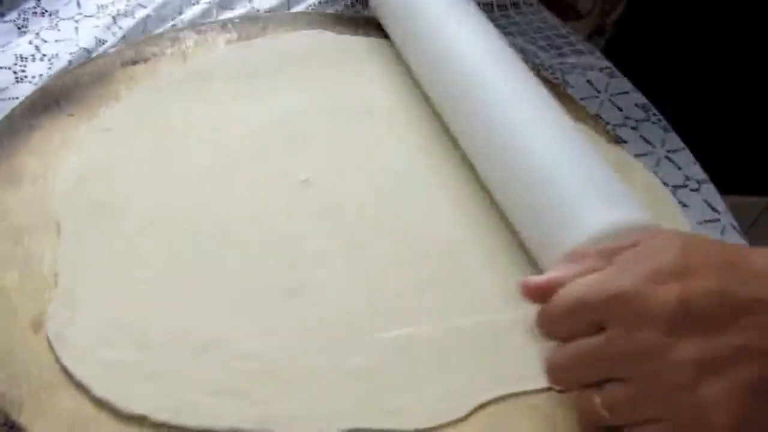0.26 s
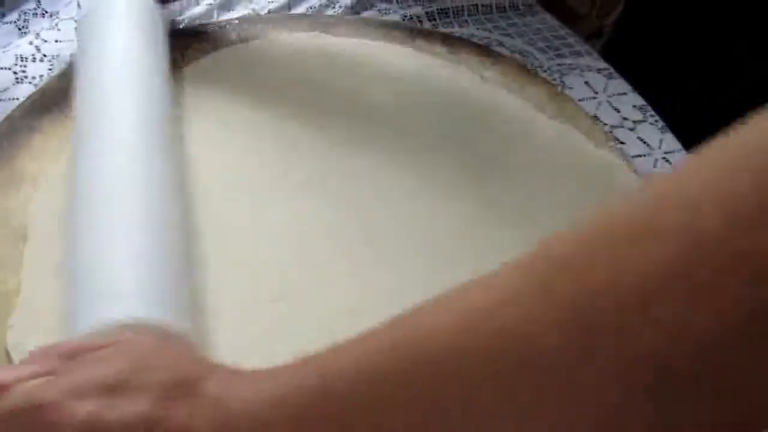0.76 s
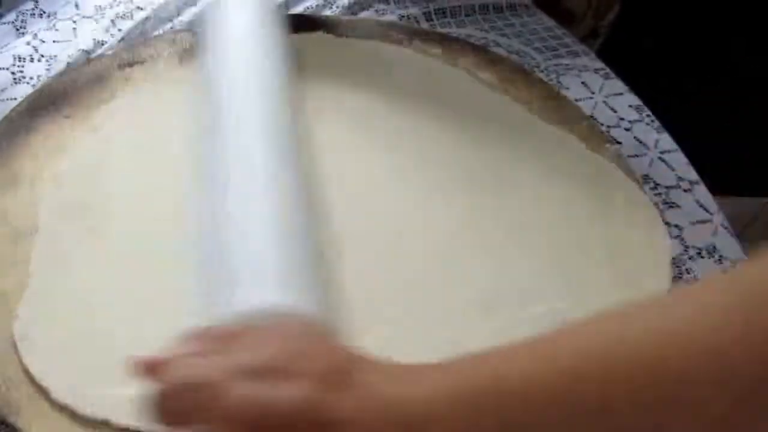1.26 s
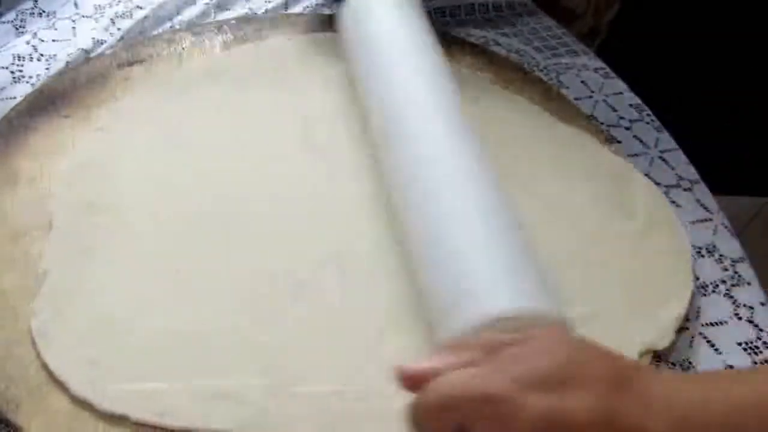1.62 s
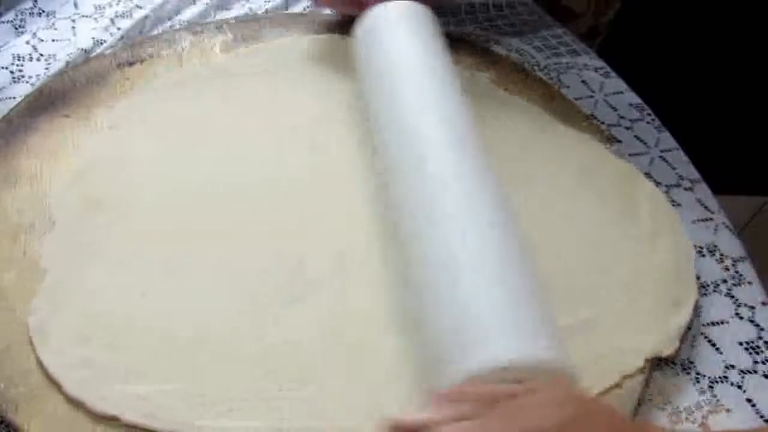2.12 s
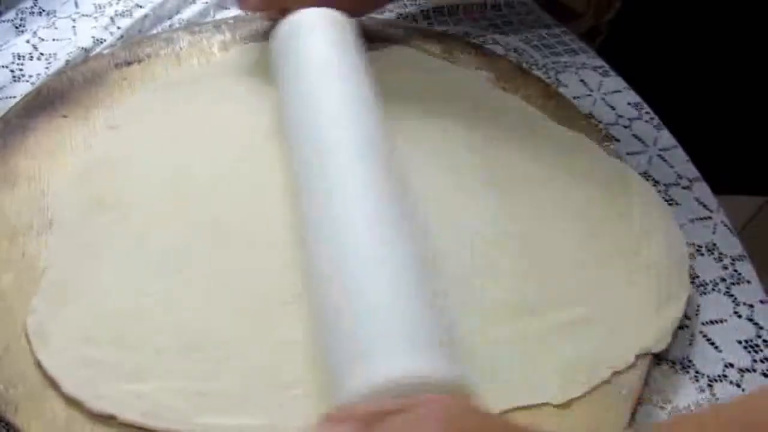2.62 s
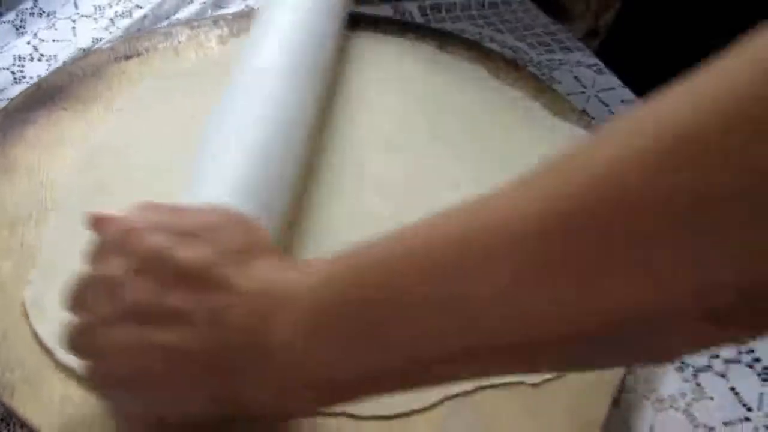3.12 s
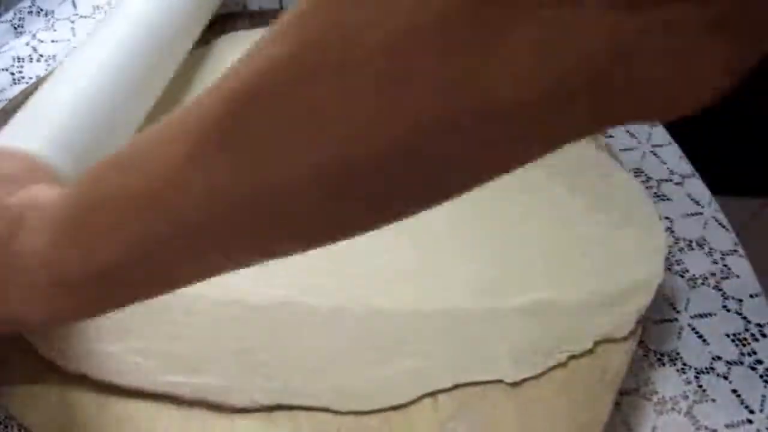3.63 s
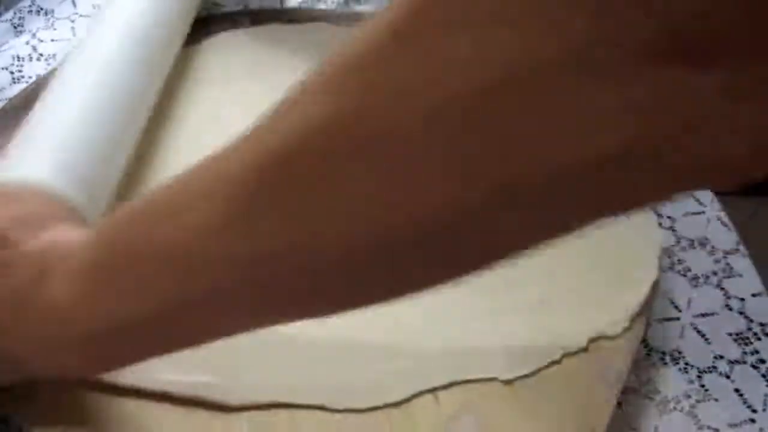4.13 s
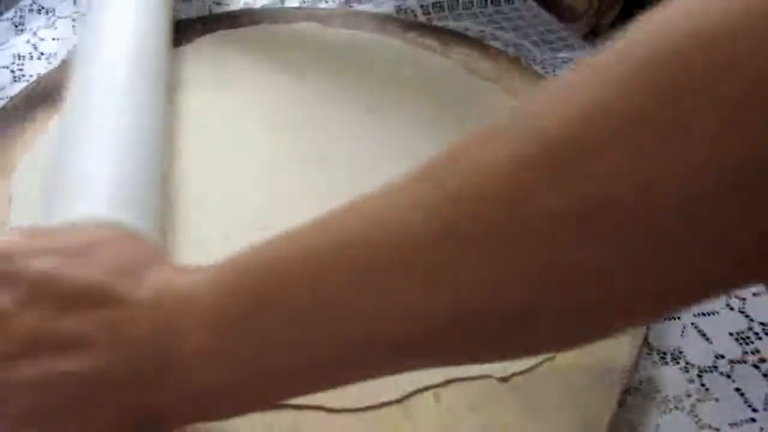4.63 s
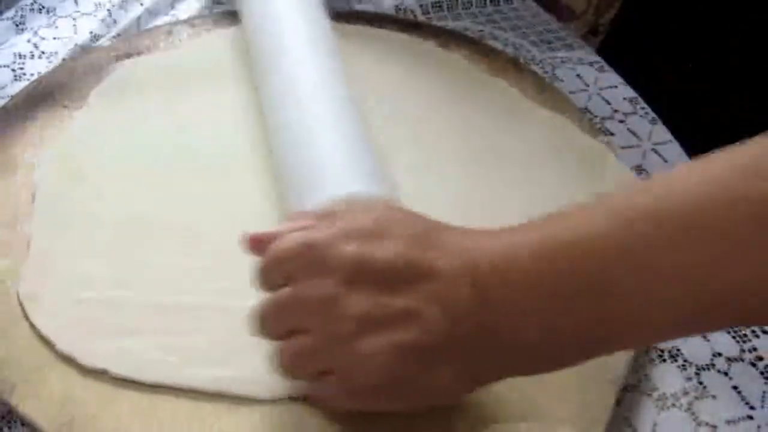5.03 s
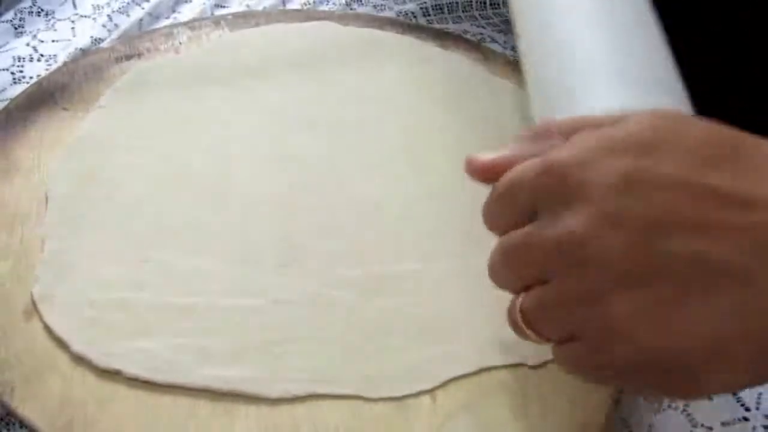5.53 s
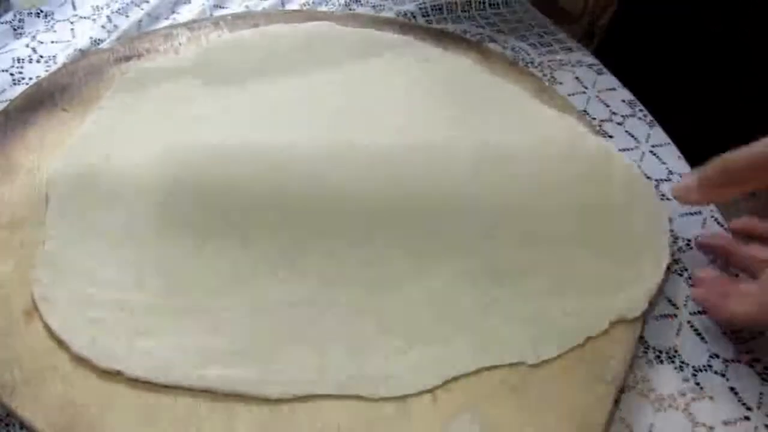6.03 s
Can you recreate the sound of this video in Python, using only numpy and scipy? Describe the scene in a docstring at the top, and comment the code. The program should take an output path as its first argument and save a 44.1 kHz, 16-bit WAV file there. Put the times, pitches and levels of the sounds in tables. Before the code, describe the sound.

Close to the microphone in a small kitchen, a plastic pin rolls dough on a wooden board in quick, overlapping strokes of dull rumble and soft hiss. Light plastic clacks and woody thuds fall irregularly. A metal object clatters faintly across the room early on, a bird chirps once a second later, and firmer knocks cluster past the middle before the rolling ends in soft rubs.

```python
"""In a kitchen, a plastic rolling pin rolls dough on a wooden board, close to the microphones.
Each push swells a set of shaped noises: table and board rumble, the pin drones, the flour hisses.
Clacks of the pin on its axle and thuds on the board are sums of fading tones, some with a crack of noise.
Narrow or broad bands of noise make soft rubs and swishes; something metal crashes and rings across the
room; a bird outside chirps once with two gliding tones. A low drone and a faint hiss lie behind it all."""
import sys
import numpy as np
from scipy import signal
from scipy.fft import rfft, irfft, next_fast_len
from scipy.io import wavfile
from scipy.ndimage import uniform_filter1d, map_coordinates

SR = 44100
rng = np.random.default_rng(int(sys.argv[2]) if len(sys.argv) > 2 else 0)


def to_wav(s):
    """Save 16-bit WAV."""
    ch = np.atleast_2d(s).T  # columns
    pcm = np.round(np.clip(ch, -1, 1) * 32767)  # PCM
    wavfile.write(sys.argv[1], SR, pcm.astype(np.int16))


N = 276053  # length in samples

# In every table of noise colour or tones, levels compare its rows; overall loudness is set elsewhere.
# Noise colours of the shaking table, the wooden board, the pin on the dough and the flour: (f/Hz, level/dB)
TABLE_COLOUR = [(20, -30), (57, -17), (80, -27), (105, -2), (140, -1), (175, -2.5), (210, -9.5), (260, -14),
                (340, -17), (570, -120)]
BOARD_COLOUR = [(120, -6), (200, -5.5), (291, -1), (345, -6.5), (519, -6.5), (720, -28.5), (940, -16.5),
                (1580, -120)]
ROLL_COLOUR = [(400, -21), (680, -13.5), (897, -2), (1310, -4), (1430, -2), (1810, -3.5), (2240, -7),
               (4500, -16), (5850, -18), (9900, -120)]
FLOUR_COLOUR = [(2500, -7), (3500, -5.5), (4500, -7.5), (5500, -2.5), (7000, 1), (9000, -3.5), (11000, -7),
                (13500, -10.5), (16000, -15)]
# Noise colour of the bright edge of fast sliding: (f/Hz, level/dB)
FIZZ_COLOUR = [(6000, -30), (8500, -5), (11000, 0), (14000, -4), (16000, -8)]
FIZZ_DB, FIZZ_GROWTH = -54, 1.5  # level/dB when flour is at -48 dB; dB gained per dB of flour
# Level that stays between pushes: (table level/dB, board level/dB, roll level/dB, flour level/dB)
REST_LEVELS = (-55, -53.5, -57, -62)


def strokes():
    """Rolling shakes table and board, the pin drones on the dough and flour hisses under pin and hands."""
    pushes = [swells(column) for column in range(2, 6)]
    table, board, roll, flour = amp(REST_LEVELS)[:, None] + pushes
    lumps = amp(1.95 * wobble(13))  # uneven dough jolts table and board at once
    table_rumble = table * rush(TABLE_COLOUR, patchy_db=1.0, grain_db=3.0)
    board_rumble = board * rush(BOARD_COLOUR, patchy_db=3.0, grain_db=-0.5)
    drone = roll * rush(ROLL_COLOUR, patchy_db=2.0, grain_db=1.0)
    hiss = flour * rush(FLOUR_COLOUR, patchy_db=-0.3, grain_db=0.84)
    fizz_gain = amp(FIZZ_DB) * (flour / amp(-48)) ** FIZZ_GROWTH
    fizz = fizz_gain * rush(FIZZ_COLOUR, patchy_db=1.2, grain_db=0.6)
    return lumps * (table_rumble + board_rumble) + drone + hiss + fizz


# Each push of the pin, with levels that add to the resting ones:
# (peak t/s, length t/s, table level/dB, board level/dB, roll level/dB, flour level/dB)
PUSHES = [(0.093, 0.25, -74, -63, -47, -69), (0.22, 0.17, -52, -47.5, -55.5, -59),
          (0.388, 0.18, -53, -53, -54.5, -60.5), (0.63, 0.34, -49.5, -47, -50, -51.5),
          (0.817, 0.26, -45, -48, -44, -67), (0.974, 0.44, -43, -45, -51, -54.5),
          (1.23, 0.22, -50, -44, -54.5, -54.5), (1.395, 0.19, -55, -40, -55, -54),
          (1.5, 0.18, -42, -45, -52, -60), (1.661, 0.21, -45, -47, -42.5, -48),
          (1.794, 0.3, -52, -44.5, -52, -60), (1.975, 0.23, -45, -41, -48.5, -52.5),
          (2.176, 0.3, -38.5, -39.5, -46, -50), (2.397, 0.27, -43, -42.5, -44.5, -50),
          (2.571, 0.23, -33, -45.5, -47, -55), (2.743, 0.21, -47, -42, -47.5, -52),
          (2.902, 0.34, -35, -42, -48.5, -55), (3.114, 0.36, -49, -43, -50.5, -54.5),
          (3.44, 0.19, -42, -42.5, -53, -54), (3.572, 0.24, -54, -50, -51, -55.5),
          (3.727, 0.21, -57, -62, -55.5, -54.5), (3.931, 0.25, -52, -50, -49, -42),
          (4.087, 0.16, -47, -46, -49, -45), (4.28, 0.24, -48, -48, -43.5, -58),
          (4.428, 0.19, -52.5, -43, -50, -50.5), (4.579, 0.16, -50, -39.5, -46, -48.5),
          (4.733, 0.27, -35, -43, -42.5, -53), (4.894, 0.26, -58, -49, -49, -46),
          (5.084, 0.15, -47, -46, -45.5, -47), (5.2, 0.27, -46.5, -47.5, -46.5, -45),
          (5.35, 0.16, -50, -49, -51.5, -49.5), (5.523, 0.29, -58, -44.5, -44.5, -42),
          (5.705, 0.17, -44, -44, -55, -59), (5.88, 0.41, -43.5, -44.5, -53.5, -53.5),
          (6.23, 0.38, -57, -48, -53, -58)]
RISE = 0.51  # share of a push before its peak


def swells(column):
    """Gain curve of all pushes, each a smooth rise and fall that peaks at the level in its column."""
    t = np.arange(0, N, 64) / SR  # one point every 64 samples is enough
    peak_s, length, db = np.transpose(PUSHES)[[0, 1, column], :, None]
    share = np.where(t < peak_s, RISE, 1 - RISE)
    u = (t - peak_s) / share / length
    gain = (amp(db) * np.exp(-4 * np.abs(u) ** 2.2)).sum(axis=0)
    return np.interp(np.arange(N) / SR, t, gain)


# Tones of the plastic pin: (f/Hz, level/dB, time to fade by 60 dB t/s)
PIN_TONES = [(896, -6.5, 0.032), (1063, -5, 0.04), (1247, 5, 0.016), (1505, 0.5, 0.014), (1853, 8, 0.008),
             (2107, 8, 0.0082), (2340, 1, 0.014), (2764, 5.5, 0.0097), (3190, 8, 0.012),
             (3780, 8.5, 0.0064), (4320, -2.5, 0.018), (5470, -2.5, 0.0086)]
# Noise colour of the crack in a clack: (f/Hz, level/dB)
CRACK_COLOUR = [(1500, 9), (3000, -2.5), (6000, -1.5), (10000, -6.5), (16000, -29)]
# The pin clacks on its axle, with levels before fixed trims:
# (t/s, clack level/dB, favoured tone f/Hz, body tone level/dB, end tone level/dB, crack level/dB)
CLACKS = [(0.001, -5.5, 2120, -7.5, -19, -30), (0.016, -9.5, 1070, -11.5, -17, -28.5),
          (0.187, -27.5, 1760, -11, -12, -40), (0.727, -23.5, 1110, -5, -31, -46),
          (0.742, -6, 2790, -5, -3, -27), (0.824, -27, 1260, -4, -20, -26),
          (0.87, -22, 1170, -3, -4.5, -27), (1.219, -12, 1060, -6.5, -11, -39),
          (1.385, -12, 2340, -3.5, -9.5, -30), (1.616, -17, 1040, 2, -5, -32),
          (1.776, -32, 865, 3.5, -25, -30), (2.0066, -18.5, 1900, -6, -25, -41),
          (2.116, -24.5, 1220, -7, -26, -39), (2.454, -15, 1060, -11.5, -24, -49),
          (2.56, -19.5, 1165, -5, -18, -41), (3.024, -36, 880, 6.5, -24, -34),
          (3.204, -18, 1490, -10, -16, -18), (3.211, -20, 850, -1.5, -7.5, -25),
          (3.357, -24, 2120, -29, -18, -45), (3.382, 0.5, 1937, -13.5, -17.5, -28.5),
          (3.397, -25, 1200, 3, -20.5, -33), (3.455, -30, 1212, -2, -2, -17),
          (3.582, -20.5, 1580, -1.5, -18, -26), (4.06, -9.5, 1077, -11, -21, -41),
          (4.142, -21.5, 1500, -16, -24, -33), (4.189, -13.5, 2500, -2, -5, -30),
          (4.192, -4.5, 1970, -4, -3.5, -26.5), (4.203, -13, 990, -1, -20, -40),
          (4.402, -22, 1090, -2.5, -11, -34), (4.525, -21, 1220, -6.5, -10.5, -39),
          (4.533, -23, 1860, -16, -6, -28), (4.546, -19, 2370, -19, -8, -41),
          (4.553, -11.5, 1850, -6, -17, -48), (4.563, -6, 2100, -5.5, -11.5, -48),
          (4.659, -28, 996, 1, -24, -23), (4.673, -14, 1050, -5.5, -10, -29),
          (4.686, -2.5, 1440, -7, -16, -36), (5.074, -15, 1033, -7, -4.5, -32),
          (5.479, -20, 877, -5.5, -27, -35), (5.587, -21, 1480, -4.5, -28, -32),
          (5.639, -18, 2390, -8.5, -5, -16), (5.644, -22, 2120, 1, -7, -33)]
# Echoes from the nearest walls, before the room gain and a trim: (delay t/s, level/dB)
ECHOES = [(.0065, -9.5), (0.011, -10.5), (0.019, -9.5), (0.025, -33)]
ROOM_DB, ROOM_SHRINKS = -5.5, 0.22  # room gain for a clack listed at -21 dB; dB less per dB harder


def clacks():
    """Each clack rings the pin and cracks briefly, then comes back as wall echoes and a room tail."""
    out, t = np.zeros((2, N)), np.arange(SR // 3) / SR
    for s, db, tone_hz, body_db, end_db, crack_db in CLACKS:
        tilt = [(1200, body_db + 2), (1900, -2.5), (3000, end_db + 2.5)]
        tones = ring(PIN_TONES, t, 0.001, scatter_db=1.5, tilt=tilt, near_hz=tone_hz)
        snap = coloured_burst(CRACK_COLOUR, len(t))
        slow_crack = snap * amp(crack_db + 18 - 60 * t / 0.036)
        quick_crack = snap * amp(crack_db + 22.5 - 60 * t / 0.0031)
        crack = slow_crack + quick_crack
        direct_db = db - 8.0
        room_db = direct_db + ROOM_DB - ROOM_SHRINKS * (db + 21)
        add(out, s, amp(direct_db) * (tones + crack))
        add(out, s, amp(room_db) * kitchen(all_round(tones + crack[0])))
        for delay, echo_db in ECHOES:
            add(out, s + delay, amp(room_db - 1.0 + echo_db) * (tones + crack))
    return out


# Tones of the wooden board and table: (f/Hz, level/dB, time to fade by 60 dB t/s, before damping)
BOARD_TONES = [(58.3, -6, 0.083), (88, -16, 0.27), (132.7, 3, 0.14), (193.4, -1, 0.096),
               (213.6, -1.5, 0.076), (258.7, -1.5, 0.17), (304.6, 1, 0.19), (339.4, -7, 0.16),
               (380, -7.5, 0.11), (525, -10, 0.075)]
# The pin's weight thuds the board, with levels that tilt the board's tones; the last column is
# damping, where 1 keeps the listed fade times and less rings longer:
# (t/s, board level/dB, table level/dB, favoured tone f/Hz, damping)
THUDS = [(0.008, -39.5, -26, 297, 1.05), (0.871, -30, -48, 338, 1.56), (1.386, -33.5, -50, 300, 1.54),
         (1.616, -34, -42, 390, 0.81), (2.508, -36.5, -46, 300, 2), (2.937, -40.5, -44, 258, 0.9),
         (3.211, -21.5, -22, 284.5, 1.06), (3.381, -34, -42, 387, 1.3), (3.397, -24, -21.5, 140, 1.67),
         (3.455, -40, -34, 300, 1.4), (4.06, -41, -30.5, 300, 1.6), (4.19, -18, -28, 385, .9),
         (4.201, -17, -25, 221, 1.37), (4.402, -39.5, -48, 294, 1.35), (4.527, -35, -45, 190, 1.6),
         (4.553, -32, -36, 340, 1.2), (4.661, -30, -40, 260, 1.2), (4.673, -25, -27, 298, 2),
         (4.685, -21, -15.5, 296, 1.43), (5.073, -42, -50, 296, 1.05), (5.644, -16.5, -20, 275, 0.93)]


def thuds():
    """Each thud rings the board and the table under it; more damping makes the tones fade faster."""
    out, t = np.zeros((2, N)), np.arange(SR // 3) / SR
    for s, board_db, table_db, tone_hz, damping in THUDS:
        tilt = [(150, table_db), (240, board_db)]
        thud = ring(BOARD_TONES, t, 0.0042, scatter_db=0.0, tilt=tilt, near_hz=tone_hz, damping=damping)
        add(out, s, thud)
        add(out, s, amp(-13.5) * kitchen(thud))
    return out


# Soft rubs and swishes, narrow or broad bands of noise, with levels before a 3 dB trim and the swell:
# (start t/s, length t/s, centre f/Hz, width f/Hz, level/dB)
RUBS = [(3.197, 0.024, 1530, 1500, -37), (4.868, 0.053, 8400, 1580, -44), (4.971, 0.11, 3090, 400, -48),
        (5.051, 0.09, 10400, 5000, -38.5), (5.81, .09, 2230, 150, -44.5), (5.816, 0.061, 2600, 150, -46),
        (5.818, .09, 3440, 900, -45), (5.849, 0.043, 1660, 200, -47), (6.056, 0.029, 1684, 150, -41.5),
        (6.203, .055, 840, 121, -40)]


def rubs():
    """Soft rubs and swishes: narrow or broad bands of noise that swell quickly and fade more slowly."""
    out = np.zeros((2, N))
    for s, length, hz, width_hz, db in RUBS:
        u = np.arange(round(length * SR)) / (length * SR)  # progress from 0 to 1
        noise = rng.standard_normal(len(u))
        band = filtered(noise, lambda f: 1 / (1 + ((f - hz) / width_hz * 2) ** 2))
        swell = amp(db - 3.0) * unit(band) * np.sin(np.pi * u ** 0.41)
        add(out, s, swell)
        add(out, s, amp(-8.0) * kitchen(swell))
    return out


# The metal clatter, one event: (t/s, crash level/dB, ring level/dB)
CLATTER = (1.52, -13, -23)
# Tones of the metal thing: (f/Hz, level/dB, time to fade by 60 dB t/s)
METAL_TONES = [(252.6, -5, 0.33), (304, -6, 0.22), (396.5, -2, 0.26), (467, -6.5, 0.24), (1048, -7, 0.41),
               (1253, -5, .25), (1600, -3, 0.25), (2600, -10, 0.23), (7160, -11, .15), (10700, -4, 0.14),
               (11600, -13, 0.18)]
# Noise colour of its crash: (f/Hz, level/dB)
CRASH_COLOUR = [(59, -43), (100, -7), (481, -13.5), (705, -37), (991, -14), (1280, -5.5), (1910, -12),
                (2580, -9.5), (3400, -17), (10500, -17), (16000, -19.5)]


def clatter():
    """A metal thing drops far off: a short noise crash and ringing tones, each with a room tail."""
    out, t = np.zeros((2, N)), np.arange(SR // 2) / SR
    s, crash_db, ring_db = CLATTER
    crash = coloured_burst(CRASH_COLOUR, len(t)) * amp(crash_db - 60 * t / 0.059)
    metal = amp(ring_db) * ring(METAL_TONES, t, 0.0063, scatter_db=4.5)
    add(out, s, crash + metal)
    add(out, s, amp(1.5) * kitchen(all_round(crash[0])))
    add(out, s, amp(-6) * kitchen(metal))
    return out


# Path of the bird's two voices, before random wavering and a trim:
# (t/s, upper f/Hz, upper level/dB, lower f/Hz, lower level/dB)
CHIRP = [(2.55, 8330, -70, 7800, -75), (2.575, 8450, -44, 7800, -59), (2.6, 8400, -37.5, 7290, -49),
         (2.63, 8400, -64, 7460, -40), (2.66, 8000, -42.5, 7070, -65), (2.7, 8270, -59, 7170, -54),
         (2.78, 8300, -64, 7000, -61), (2.86, 8300, -73, 7300, -75)]


def bird():
    """One rough whistle: two gliding tones waver in pitch and level, smeared by echoes."""
    upper_hz, upper_db, lower_hz, lower_db = curves(CHIRP)

    def voice(hz, db):
        """A sine whose pitch and level waver."""
        level = amp(db + 2.7 * wobble(150))
        phase = 2 * np.pi * np.cumsum(hz + 230 * wobble(300)) / SR
        return level * np.sin(phase)

    first, last = round(CHIRP[0][0] * SR), round(CHIRP[-1][0] * SR)
    call = (voice(upper_hz, upper_db) + voice(lower_hz, lower_db))[first:last]
    out = np.zeros((2, N))
    add(out, first / SR, 0.71 * call)
    add(out, first / SR, amp(5) * kitchen(call))
    return out


# Noise colours of the background drone and hiss: (f/Hz, level/dB)
DRONE_COLOUR = [(12, -43), (20, -3), (238, -2.5), (367, -5.5), (409, -9), (498, -8.5), (665, -28),
                (841, -20.5), (1500, -26), (1950, -52), (3300, -120)]
HISS_COLOUR = [(590, -25), (1000, -4), (1860, -16), (2410, -15), (3310, -27), (12000, -11), (16500, -35)]


def background():
    """A low, gently wavering drone, opposite in the two channels, and a faint hiss of its own in each."""
    drone = unit(filtered(rng.standard_normal(N), lambda hz: amp(along(DRONE_COLOUR, hz))))
    hiss = unit(filtered(rng.standard_normal((2, N)), lambda hz: amp(along(HISS_COLOUR, hz))))
    return amp(-44.5 + 3.6 * wobble(5)) * drone * [[1], [-1]] + amp(-58.5) * hiss


# How long the room rings: (f/Hz, time to fade by 60 dB t/s)
ROOM_FADE = [(150, 0.46), (1000, 0.35), (3000, 0.39), (8000, 0.37), (15000, 0.17)]
# Colour of the room's answer: (f/Hz, level/dB)
WALL_COLOUR = [(100, -6), (450, 9.5), (700, -2.5), (1000, 2.5), (1500, -1.5), (2200, -4), (3300, -4),
               (6000, -1.5), (15000, 0)]


def kitchen(x):
    """The walls' answer: a new noise tail each time, every frequency dying at its own speed."""
    hz, t, z = signal.stft(rng.standard_normal((2, SR // 2)), SR, nperseg=256)
    colour_db = along(WALL_COLOUR, hz)[:, None]
    fade_db = 60 * t / along(ROOM_FADE, hz)[:, None]
    tail = signal.istft(z * amp(colour_db - fade_db), SR, nperseg=256)[1]
    fade_in = np.clip(np.arange(tail.shape[1]) / SR / .007, 0, 1)  # over 7 ms
    tail = spread(tail * fade_in)
    return signal.fftconvolve(x[None], tail / np.linalg.norm(tail[0]), axes=1)


def all_round(x):
    """A blow as the walls get it from every side: one click, the narrow peaks of its spectrum averaged out."""
    power = uniform_filter1d(np.abs(rfft(x, len(x))) ** 2, size=len(x) // 130)
    click = irfft(np.sqrt(np.abs(power)))
    return np.roll(click, shift=128)[:256] * np.hanning(256)


def ring(modes, t, attack, scatter_db, tilt=((1, 0),), near_hz=0, damping=1):
    """A struck thing: fading tones of random strength, tilted by where the blow lands, boosted near near_hz."""
    hz, db, t60 = np.transpose(modes)[:, :, None]
    luck = rng.standard_normal((2, len(modes), 1))  # for strengths and for phases
    favour_db = 7 * np.exp(-((hz - near_hz) / (0.093 * hz)) ** 2)
    start_db = db + along(tilt, hz) + favour_db + scatter_db * luck[0]
    level = amp(start_db - 60 * damping * t / t60)
    tones = level * np.sin(2 * np.pi * hz * t + 0.63 * luck[1])
    return tones.sum(axis=0) * (1 - np.exp(-t / attack))


def rush(spectrum, patchy_db, grain_db):
    """Stereo noise of rms 1 with patches of random gain and a grainy fast flutter."""
    z = signal.stft(rng.standard_normal((2, N)), nperseg=512)[2]
    field = uniform_filter1d(rng.standard_normal(z.shape[1:]), size=3, axis=0)  # smooth over frequency
    field = uniform_filter1d(field, size=8, axis=1)  # smooth over time
    patchy = signal.istft(z * amp(patchy_db * unit(field)), nperseg=512)[1][:, :N]
    pair = patchy * amp(grain_db * wobble(150))
    return unit(spread(filtered(pair, lambda hz: amp(along(spectrum, hz)))))


def coloured_burst(spectrum, length):
    """Steady stereo noise of rms 1 in the given colour, ready to be faded."""
    noise = rng.standard_normal((2, length))
    return unit(spread(filtered(noise, lambda hz: amp(along(spectrum, hz)))))


# How alike left and right are: (f/Hz, likeness from 0 to 1)
ALIKE = [(60, 0.077), (130, 0.17), (300, 0.91), (640, 0.7), (1400, 0.89), (3100, 1), (6000, 0.95),
         (9000, 0.7), (12000, 0.53), (15000, 0.18)]


def spread(pair):
    """Two unrelated signals mixed into left and right of the right likeness."""
    def mix(hz):
        turn = np.arccos(np.clip(along(ALIKE, hz), 0, 1)) / 2
        return np.array([np.cos(turn), np.sin(turn)])

    mid, side = filtered(pair, mix)
    return np.array([mid + side, mid - side])


def amp(db):
    """Decibels to gain."""
    return 10 ** (np.asarray(db) / 20)


def unit(x):
    """Scaled to rms 1."""
    return x / np.sqrt(np.mean(x ** 2) + 1e-20)


def along(points, hz):
    """Read a curve of (f/Hz, value) points on a log frequency axis."""
    f, v = np.transpose(points)
    return np.interp(np.log(hz + 1), np.log(f + 1), v)


def curves(rows):
    """One value per sample for each column after the time."""
    s, *cols = np.transpose(rows)
    return [np.interp(np.arange(N) / SR, s, c) for c in cols]


def wobble(rate):
    """A smooth curve through random points, rate of them a second."""
    points = rng.standard_normal(int(N * rate / SR) + 4)
    return map_coordinates(points, [np.arange(N) * rate / SR])


def filtered(x, response):
    """x times a complex response of frequency."""
    m = next_fast_len(x.shape[-1] + 8192)
    spectrum = rfft(x, m) * response(np.fft.rfftfreq(m, 1 / SR))
    return irfft(spectrum, m)[..., :x.shape[-1]]


def add(out, s, x):
    """Mix x into out from time s in seconds."""
    part = out[:, round(s * SR):][:, :x.shape[-1]]
    part += np.atleast_2d(x)[:, :part.shape[1]]


def scene():
    """Everything that sounds in front of the steady background."""
    return strokes() + clacks() + thuds() + rubs() + clatter() + bird()


# How far the left microphone port leads the right: (f/Hz, phase/radians)
LEAD = [(40, 1), (130, .8), (300, .55), (780, .28), (2200, .03), (16000, 0)]
TOP_HZ = 15900  # nothing is kept from here up


def record(dry):
    """The two ports differ in phase and a little in level; the background joins and the top is cut off."""
    half = np.array([[.5], [-.5]])  # each port takes half the difference
    louder_left = [(300, -1.1), (700, -0.2), (4000, 0.59), (8000, -1.3)]  # (f/Hz, level/dB)

    def ports(hz):
        return np.exp(1j * half * along(LEAD, hz)) * amp(half * along(louder_left, hz))

    return filtered(filtered(dry, ports) + background(), lambda hz: hz < TOP_HZ)


dry = scene()
out = record(dry)
to_wav(out)
```